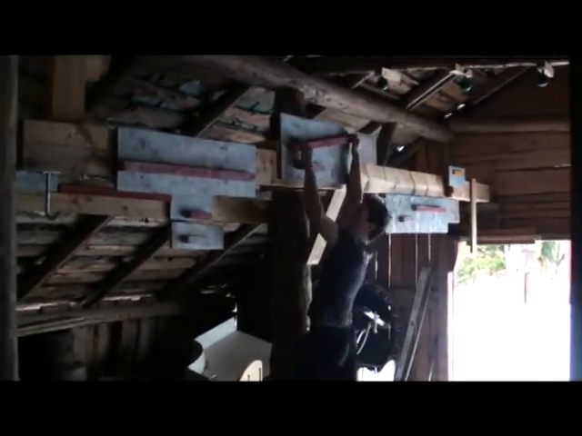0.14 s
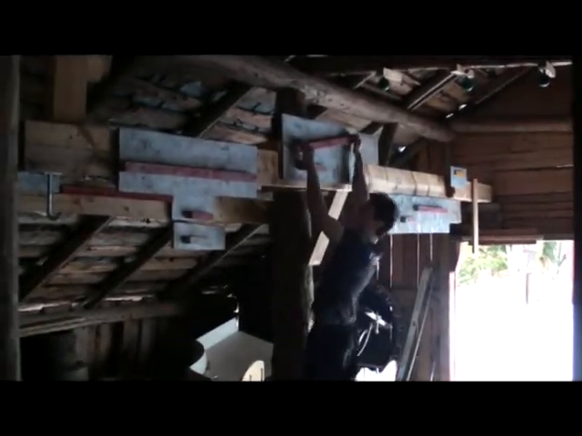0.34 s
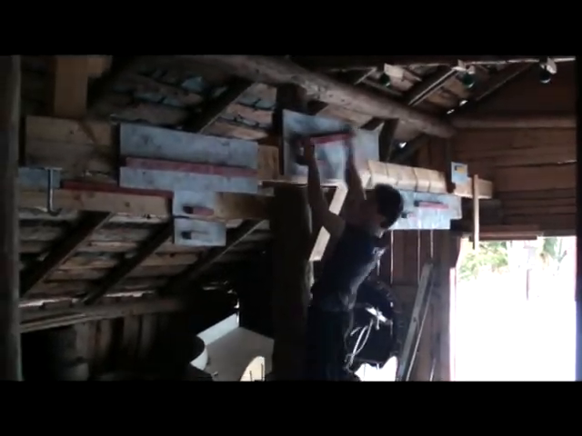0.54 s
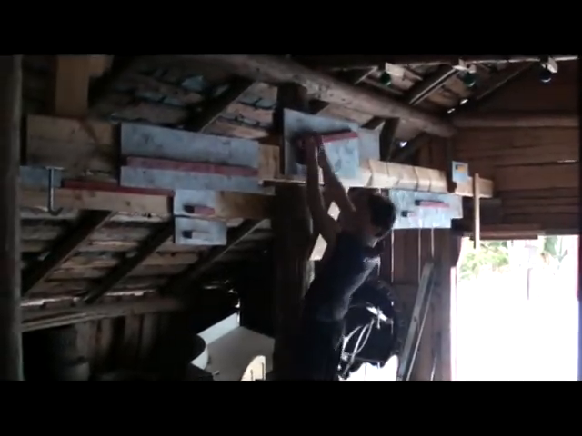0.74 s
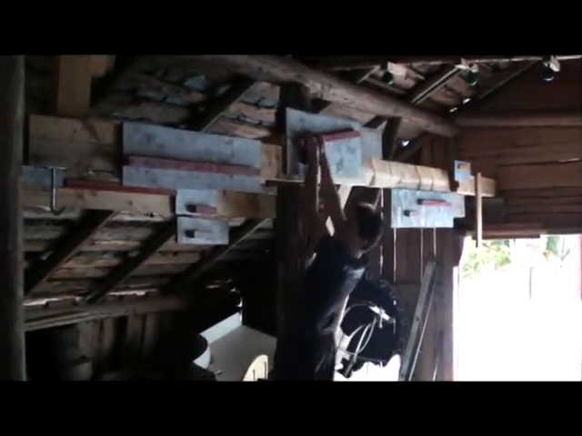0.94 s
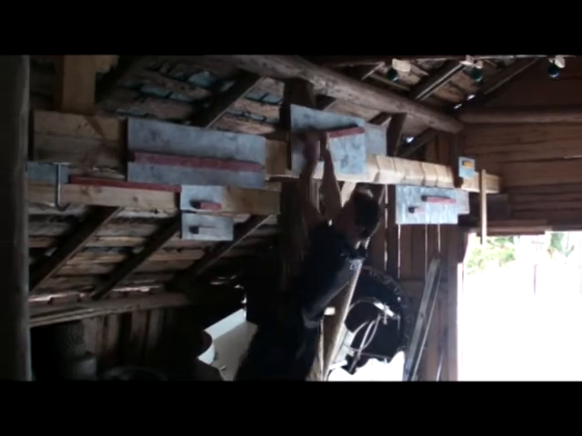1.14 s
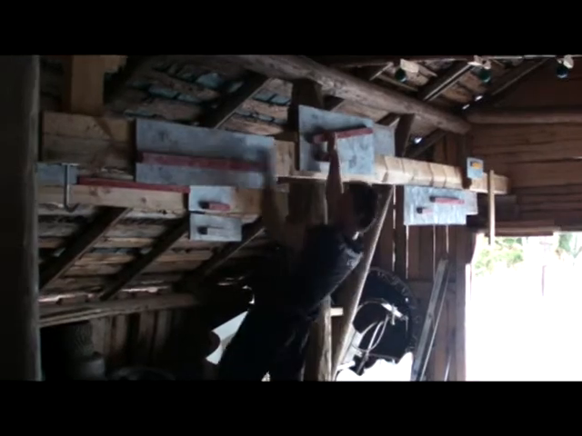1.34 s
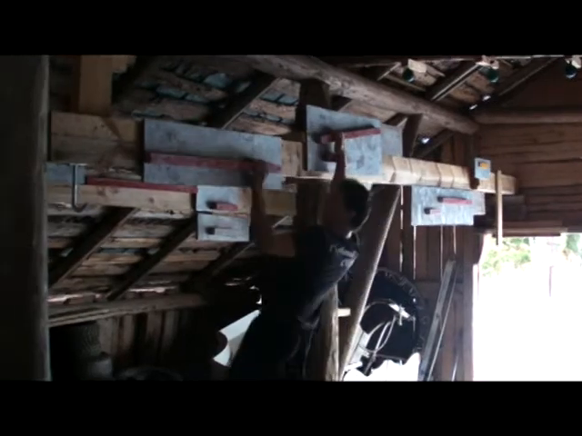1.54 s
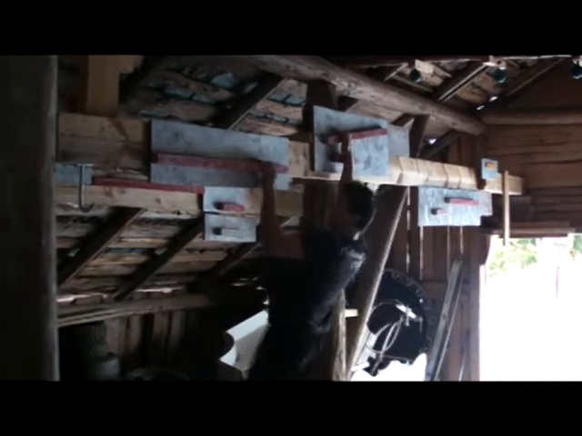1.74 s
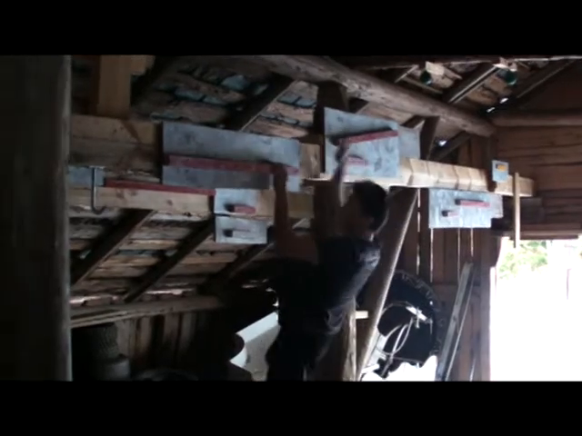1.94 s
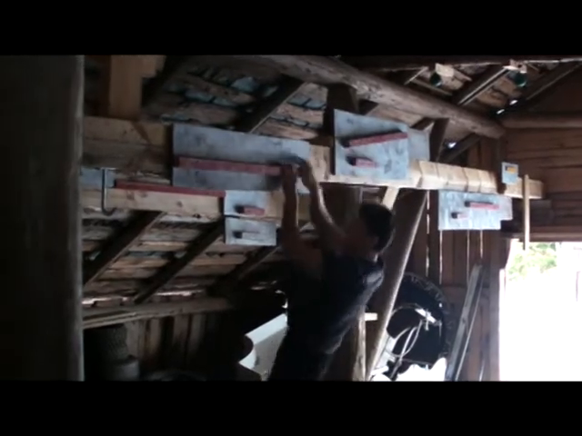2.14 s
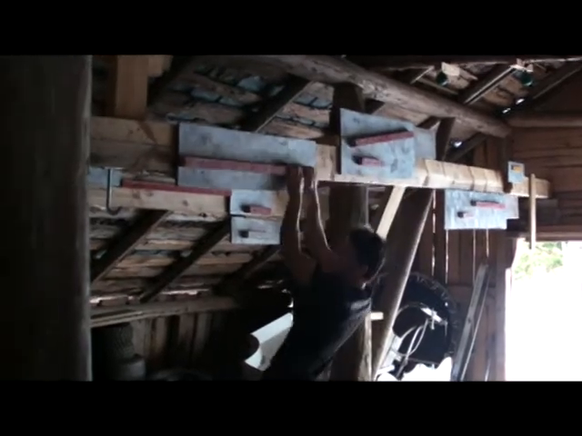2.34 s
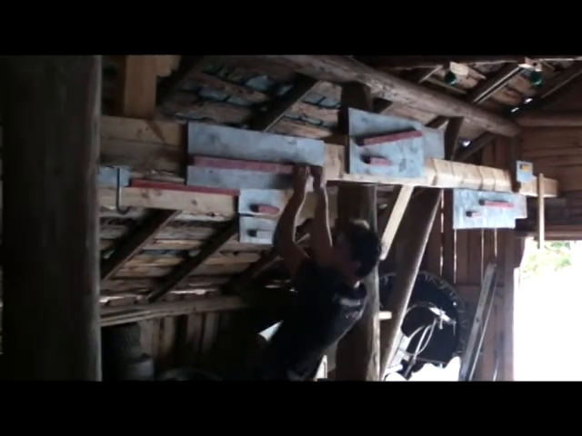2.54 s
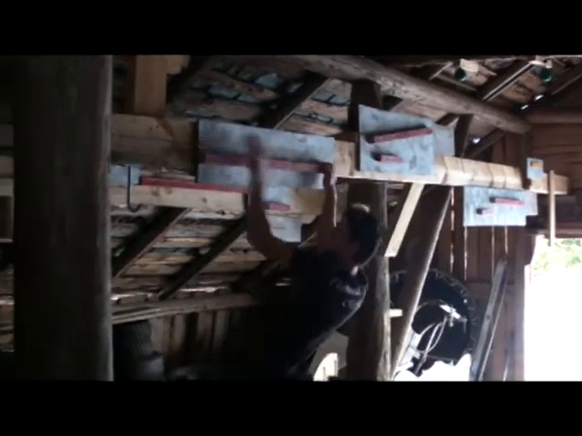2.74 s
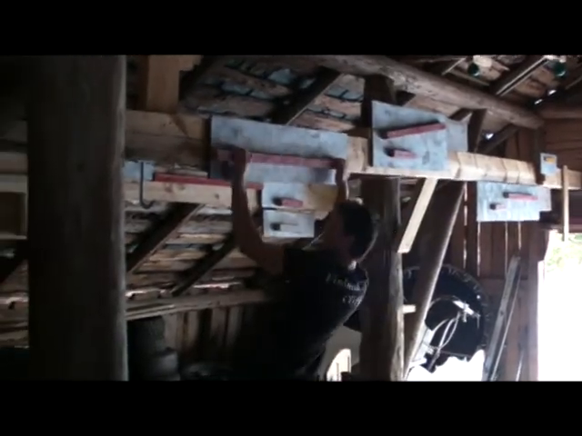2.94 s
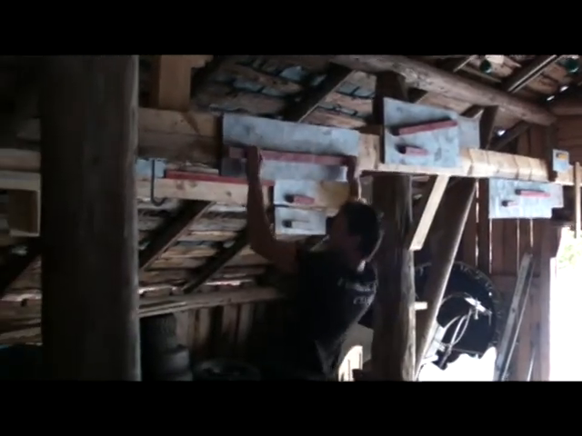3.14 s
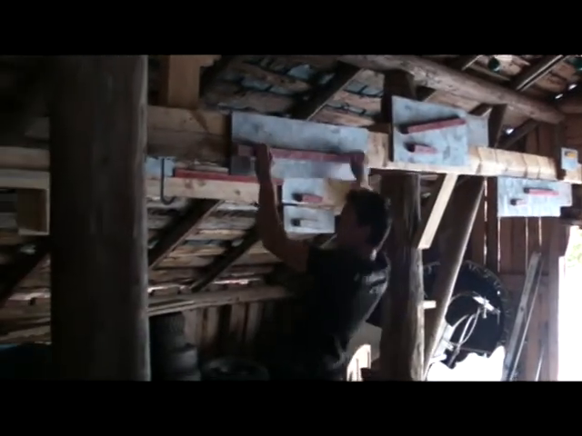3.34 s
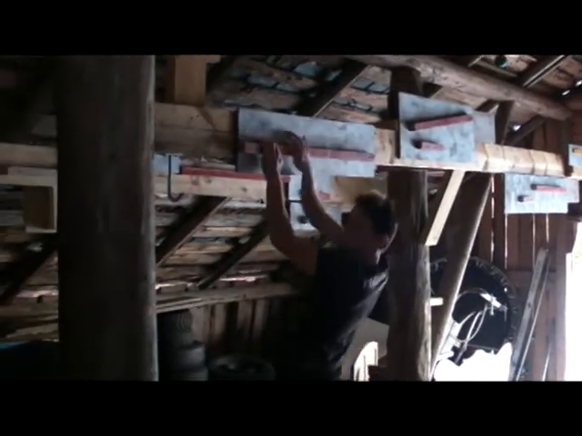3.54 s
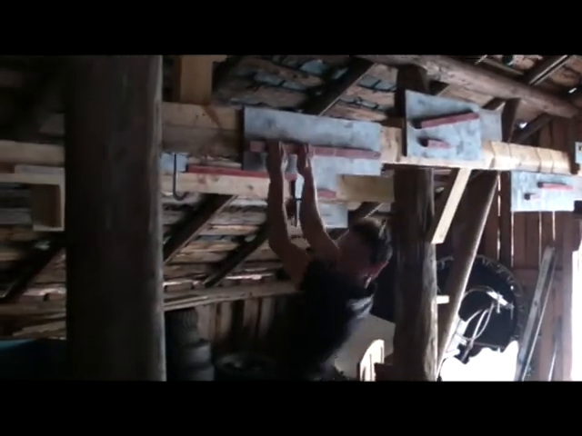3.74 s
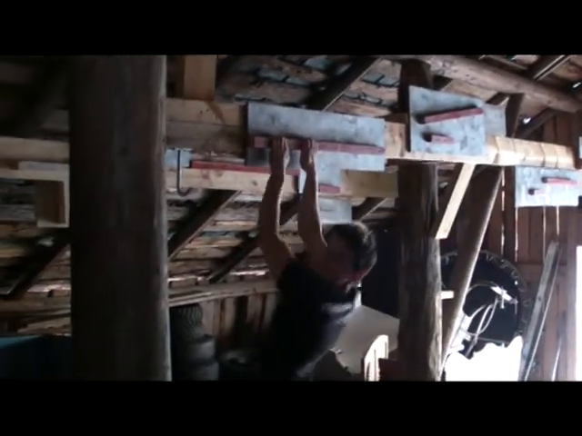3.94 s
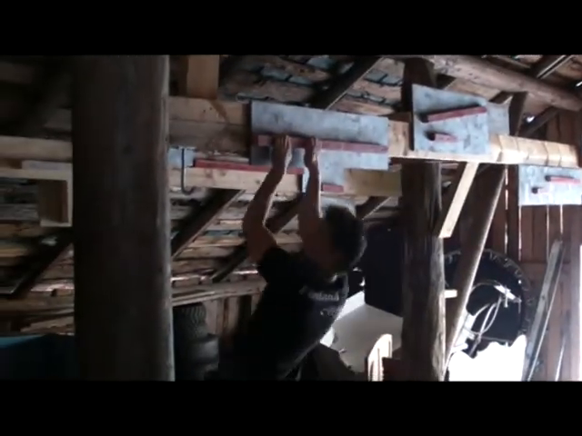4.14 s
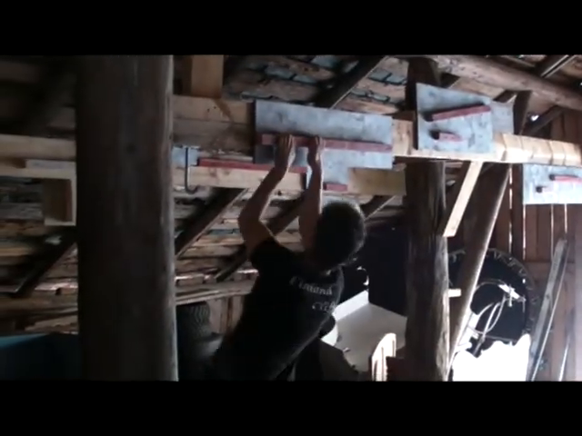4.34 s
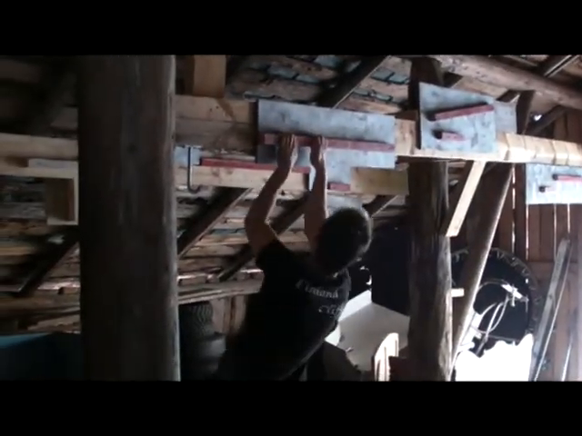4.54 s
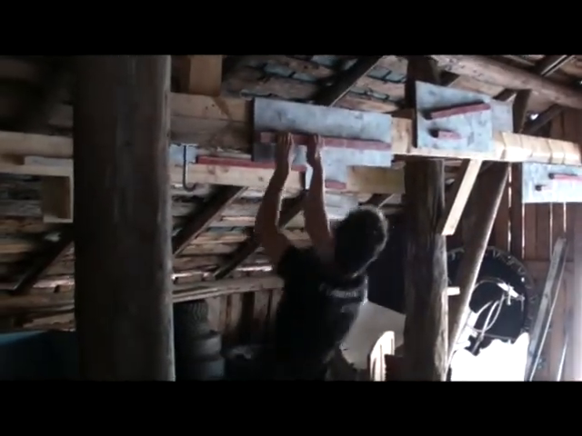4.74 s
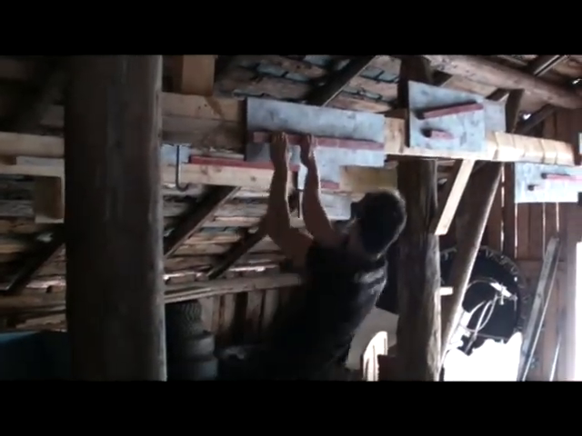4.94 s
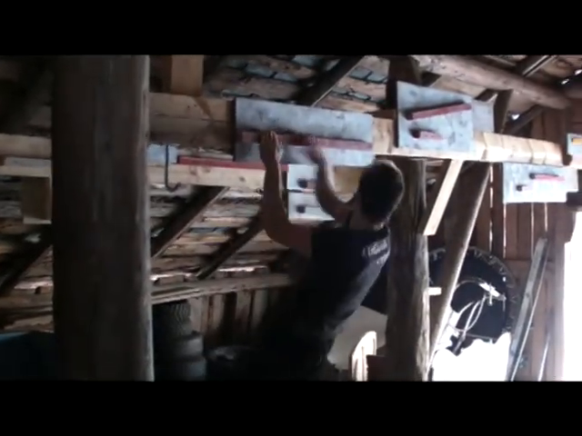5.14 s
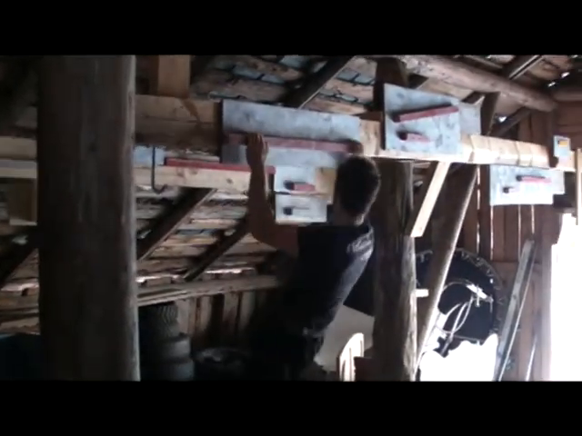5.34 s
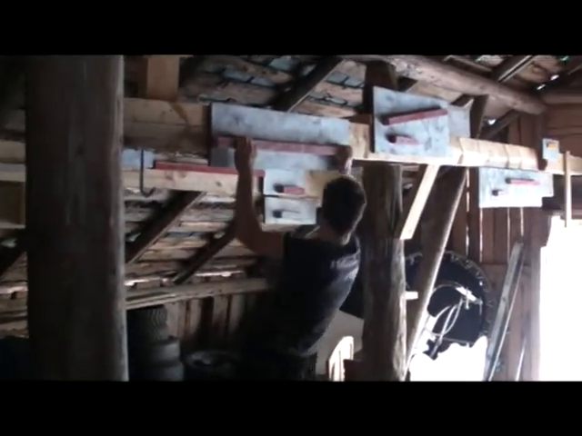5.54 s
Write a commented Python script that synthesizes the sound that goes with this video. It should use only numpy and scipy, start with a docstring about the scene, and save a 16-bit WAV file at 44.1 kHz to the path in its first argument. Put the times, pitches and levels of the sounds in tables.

```python
"""In a barn, a climber traverses narrow wooden ledges screwed to a beam. In each move a hand drags off its hold,
lands with a dull thud and scuffs into its grip; once the loaded timber cracks, once a board knocks hard.
Contacts are impulses through wood resonances plus noise slaps; scuffs are grainy friction noise.
Clothes rustle and the frame rumbles as shaped noise over soft air, with a burst of the rustling noise under
the crack; the barn answers the contacts with brief, dense reflections."""
import sys
import numpy as np
from scipy import signal
from scipy.fft import rfft, irfft, next_fast_len
from scipy.io import wavfile
from scipy.ndimage import map_coordinates

SR = 44100
rng = np.random.default_rng(int(sys.argv[2]) if len(sys.argv) > 2 else 0)


def file_out(sig):
    """Save sig as 16-bit WAV at sys.argv[1]."""
    # one column per channel
    cols = np.atleast_2d(sig).T
    # limit, then scale
    lim = np.clip(cols, -1, 1)
    pcm = np.round(lim * 32767).astype(np.int16)
    wavfile.write(sys.argv[1], SR, pcm)


N = 246959
T = np.arange(SR // 4) / SR  # the life of one blow, s
SCUFF_LEAD_S = .2  # a scuff is begun this long before its peak

# dry friction and slap spectrum: [f/Hz, relative level/dB]
RASP_SPECTRUM = [(100, -37), (400, -14.5), (1000, -8), (1700, -6), (2700, -3.5), (3500, -9.5), (4500, -11),
                 (7000, -14.5), (10000, -13.5), (12000, -38), (16000, -45)]
# bright friction and grit spectrum: [f/Hz, relative level/dB]
HISS_SPECTRUM = [(1000, -5.5), (4000, -18), (6500, -14.5), (8300, -5), (9400, -4), (10600, -12),
                 (12000, -20), (16000, -30)]


def amp(db):
    """Decibels to gain."""
    return 10 ** (np.asarray(db) / 20)


def unit(x):
    """Scaled to rms 1."""
    return x / np.sqrt(np.mean(x ** 2) + 1e-20)


def burst(x):
    """Scaled to the energy of 30 ms at rms 1."""
    return unit(x) * np.sqrt(.03 * SR / x.shape[-1])


def along(points, hz):
    """(Hz, value) points read on a log frequency axis."""
    f, v = np.transpose(points)
    return np.interp(np.log(hz + 1), np.log(f + 1), v)


def curve(rows):
    """(s, value) rows as one value per sample."""
    return np.interp(np.arange(N) / SR, *np.transpose(rows))


def filtered(x, response):
    """x times a complex response of frequency."""
    n = x.shape[-1]
    m = next_fast_len(n + SR // 8, True)  # padded so that tails do not wrap round
    return irfft(rfft(x, m) * response(np.fft.rfftfreq(m, 1 / SR)), m)[..., :n]


def coloured(x, spectrum):
    """x shaped by (Hz, dB) points."""
    return filtered(x, lambda hz: amp(along(spectrum, hz)))


def ring(x, modes):
    """x through parallel band-pass resonances of alternating sign."""
    def response(f):
        total = 0
        for k, (centre, width, db) in enumerate(modes):
            damping = 1j * f * width
            total = total + (-1) ** k * amp(db) * damping / (centre * centre - f * f + damping)
        return total
    return filtered(x, response)


def noise(size):
    """White noise at two close microphones: alike in the bass, less so in the treble."""
    # left-right likeness: [f/Hz, correlation]
    likeness = [(100, .92), (280, .83), (600, .84), (1200, .68), (2500, .68), (4500, .4), (8500, .42),
                (13000, .12)]

    def mid_side_gains(hz):
        turn = np.arccos(np.clip(along(likeness, hz), -1, 1)) / 2
        return np.array([np.cos(turn), np.sin(turn)])
    mid, side = filtered(rng.standard_normal((2, size)), mid_side_gains)
    return np.array([mid + side, mid - side])


def grainy(size, rate, depth_db):
    """Noise that comes in clumps, rate a second, as fibres catch and let go."""
    knots = rng.standard_normal(int(size * rate / SR) + 4)
    clumps = map_coordinates(knots, [np.arange(size) * rate / SR])
    return unit(noise(size) * amp(depth_db * clumps))


def add(track, s, x):
    """Mix x into the track from time s."""
    start = max(round(s * SR), 0)
    track[:, start:start + x.shape[-1]] += x[:, :max(N - start, 0)]


def releases():
    """A hand drags off its hold: the quicker, the sooner it stops and the harder the ledge rings and springs."""
    # drags: [t of the peak/s, rise/s, rasp level/dB, hiss level/dB, centre of the ledge's modes f/Hz,
    # spread/octaves]
    drags = [(.485, 0.068, -46, -54, 543, .8), (1.148, 0.039, -45.5, -44, 950, 0.38),
             (1.886, .024, -38.5, -43, 720, 0.48), (2.615, 0.045, -45.5, -46.5, 1120, 0.39),
             (3.362, .016, -39, -42.5, 950, 0.37), (5.163, 0.032, -39.5, -40, 890, 0.64)]
    usual_rise_s, usual_fall_s = 0.029, 0.029
    quick_db = 8  # gain of the ledge's ring when the rise halves
    out = np.zeros((2, N))
    for s, rise, rasp_db, hiss_db, centre_hz, spread in drags:
        slowness = rise / usual_rise_s
        fall = usual_fall_s * slowness ** 0.33
        ledge_db = rasp_db - quick_db * np.log2(slowness)
        add(out, s - SCUFF_LEAD_S, scuff(rise, fall, rasp_db, hiss_db, ledge_db, centre_hz, spread))
        # the unloaded ledge springs back
        spring = blow(ledge_db - 7, centre_hz=282, spread=0.48, slap_db=rasp_db - 11, room_db=2)
        add(out, s - rise / 2, spring)
    return out


def catches():
    """The palm lands, fingertips and beam follow, then fingers scuff into their grip as the beam takes weight."""
    # landings: [t/s, thud level/dB, centre of the modes struck f/Hz, slap level/dB, room level/dB,
    # beam level/dB, wait until the grip/s, grip rasp level/dB, grip hiss level/dB, grip centre f/Hz,
    # weight thump level/dB]
    landings = [(.712, -36.5, 443, -48, 0.5, -41.5, .096, -41, -53, 726, -41.5),
                (1.3968, -30, 261, -47, -3, -46.5, .052, -41, -44, 430, -44),
                (2.152, -37.5, 152, -44.5, 2, -43, .071, -38, -46, 480, -48),
                (2.861, -40.5, 240, -44, 8, -60, 0.073, -42.5, -39, 1260, -47),
                (3.555, -40, 215, -41.5, 8, -43.5, .089, -37, -42.5, 890, -45),
                (5.368, -36.5, 300, -47, 1, -51, .12, -44, -68, 480, -47)]
    fingers_s, fingers_db, fingers_hz = .011, -8, 358  # fingertips: delay, level against the palm, pitch
    beam_s, beam_hz = 0.0159, 138  # beam thump: delay after the landing, pitch
    out = np.zeros((2, N))
    for (s, thud_db, centre_hz, slap_db, room_db, beam_db,
         wait, rasp_db, hiss_db, grip_hz, weight_db) in landings:
        spread = 0.56 * (centre_hz / 250) ** 0.22  # octaves; a higher-pitched landing strikes a wider range
        add(out, s, blow(thud_db, centre_hz, spread, slap_db, room_db))
        fingers = blow(thud_db + fingers_db, fingers_hz, spread=0.41, slap_db=slap_db - 19, room_db=room_db)
        add(out, s + fingers_s, fingers)
        grip = scuff(rise=0.024, fall=0.035, rasp_db=rasp_db, hiss_db=hiss_db,
                     ledge_db=rasp_db - 5.5, centre_hz=grip_hz, spread=0.77)
        add(out, s + wait - SCUFF_LEAD_S, grip)
        for delay, db in (beam_s, beam_db), (wait, weight_db):
            add(out, s + delay, blow(db, beam_hz, spread=0.37, slap_db=db - 22, room_db=3))
    return out


def blow(thud_db, centre_hz, spread, slap_db, room_db):
    """One contact: a brief noise slap, and a push that rings the ledge."""
    thud = barn(ledge(signal.unit_impulse(len(T)), centre_hz, spread), room_db, hold=0.0068)
    contact = coloured(noise(len(T)) * np.exp(-T / 0.0029), RASP_SPECTRUM)
    slap = barn(contact, room_db - 2.5, hold=0.0032)
    return amp(thud_db) * burst(thud) + amp(slap_db) * burst(slap)


def scuff(rise, fall, rasp_db, hiss_db, ledge_db, centre_hz, spread):
    """Fingers slide: grainy friction swells and stops, rasping, hissing and shaking the ledge."""
    t = np.arange(-SCUFF_LEAD_S, SCUFF_LEAD_S, 1 / SR)
    stroke = 1 / np.cosh(1.516 * t / np.where(t < 0, rise, fall).clip(.003))
    friction = grainy(len(t), rate=1100, depth_db=3.2)
    rasp = stroke * coloured(friction, RASP_SPECTRUM)
    hiss = stroke * coloured(grainy(len(t), rate=900, depth_db=-0.5), HISS_SPECTRUM)
    wood = ledge(stroke * friction, centre_hz, spread)
    size = np.sqrt(np.mean(stroke ** 2))  # a longer stroke carries more energy
    return size * (amp(rasp_db) * unit(rasp) + amp(hiss_db) * unit(hiss) + amp(ledge_db) * unit(wood))


def ledge(x, centre_hz, spread):
    """The place and softness of a contact pick which of the ledge's modes answer."""
    # resonances of ledge and backing board: [f/Hz, width/Hz, relative level/dB]
    wood_modes = [(114.3, 24, 3.5), (157.6, 30, 2.5), (240, 29.6, 1.5), (295, 14, 2), (326.3, 19.7, 1.5),
                  (403.5, 38, -2), (607.6, 48, 1), (745, 45, -1), (803, 77, -6.5), (979, 85, -2),
                  (1135, 59, -4), (1328, 57, 2), (1633, 22, 0), (2060, 140, 0), (2410, 81, -10),
                  (2820, 130, -7), (3860, 120, -2)]
    away_db = lambda hz: min(3 * (np.log2(hz / centre_hz) / spread) ** 2, 80)
    return ring(x, [(hz, width, db - away_db(hz)) for hz, width, db in wood_modes])


def barn(x, wet_db, hold):
    """Direct sound plus dense reflections that stay level for hold seconds, then die away."""
    # reverberation: [f/Hz, time to fall 60 dB/s]
    decay_times = [(100, 0.39), (400, 0.2), (1200, 0.22), (3000, 0.2), (6000, 0.19), (9000, 0.24),
                   (15000, 0.18)]
    hz, t, bins = signal.stft(noise(len(T)), SR, nperseg=256)
    fade = amp(-60 * np.maximum(t - hold, 0) / along(decay_times, hz)[:, None])
    tail = signal.istft(bins * fade, SR, nperseg=256)[1][:, :len(T)]
    tail = tail * np.clip(T / 0.0045, 0, 1)  # reflections build up over 4.5 ms
    echo = signal.fftconvolve(np.atleast_2d(x), tail, axes=1)[:, :x.shape[-1]]
    return unit(x) + amp(wet_db) * unit(echo)


def crack():
    """The loaded timber lets go in one snap; splintering clatter fills the barn, the ledge rings behind it."""
    # resonances of the cracking timber: [f/Hz, width/Hz, relative level/dB]
    timber_modes = [(810, 310, -2), (1260, 450, -1), (2050, 520, -1), (2660, 370, 4.5), (3720, 420, -3.5),
                    (5150, 300, -4.5), (7100, 280, -4.5), (8540, 670, -4.5)]
    # the snap loses its highest treble on the way: [f/Hz, relative level/dB]
    treble_loss = [(9500, 4), (12000, -3), (16000, -10)]
    # clatter spectrum: [f/Hz, relative level/dB]
    splinter_spectrum = [(80, -16), (200, -11.5), (380, -13.5), (560, -4.5), (900, -6), (1300, -1),
                         (2000, -10), (2700, -5), (3600, -9.5), (4500, -11), (8800, -13.5), (11000, -23.5),
                         (15500, -41)]
    crack_s = 2.406
    out, push = np.zeros((2, N)), signal.unit_impulse(len(T))
    tearing = 0.17 * noise(len(T)) * np.exp(-T / 0.0032)
    snap = coloured(ring(push + tearing, timber_modes), treble_loss)
    clatter = coloured(barn(push, wet_db=24, hold=0.033), splinter_spectrum)
    add(out, crack_s, amp(-17.0) * burst(snap) + amp(-18) * burst(clatter))
    answer = blow(thud_db=-28.5, centre_hz=563, spread=0.22, slap_db=-52, room_db=5.0)
    add(out, crack_s + .012, answer)
    return out


def board():
    """A board slips and knocks hard: its edge clicks, its face strikes twice, and the beam thuds behind it."""
    knock_s, knock_db = 3.7762, -28.5
    chatter_s = .0037  # gap between its contacts
    out = np.zeros((2, N))
    slip = scuff(rise=0.0073, fall=.004, rasp_db=-56, hiss_db=-48, ledge_db=-30.5, centre_hz=600, spread=1.2)
    add(out, knock_s - SCUFF_LEAD_S, slip)
    add(out, knock_s, blow(knock_db - 7.0, centre_hz=2400, spread=0.42, slap_db=-35.5, room_db=4))
    for contact in (1, 2):
        face = blow(knock_db, centre_hz=814, spread=.36, slap_db=-39.5, room_db=-8.0)
        add(out, knock_s + contact * chatter_s, face)
    add(out, knock_s + .0128, blow(knock_db - 4.5, centre_hz=247, spread=.8, slap_db=-50, room_db=-1))
    return out


def knocks():
    """The frame gives a little under the moving load and knocks softly."""
    # soft knocks: [t/s, thud level/dB, centre of the modes f/Hz, spread/octaves]
    soft_knocks = [(.002, -44.5, 112, .14), (0.7936, -45, 895, 1.3), (2.277, -43, 300, 1.3),
                   (2.337, -45, 450, 0.63), (2.358, -42.5, 600, 2.6), (3.041, -37.5, 362, 0.4),
                   (3.341, -34.5, 740, .17), (5.41, -45, 290, 0.24), (5.494, -45.5, 754, .3)]
    out = np.zeros((2, N))
    for s, db, centre_hz, spread in soft_knocks:
        add(out, s, blow(db, centre_hz, spread, slap_db=db - 11, room_db=1.5))
    return out


def shifts():
    """Between moves the fingers creep on their hold in small scuffs."""
    # creeps: [t of the peak/s, rise and fall/s, rasp level/dB]
    creeps = [(.06, .02, -55.5), (.27, 0.09, -50), (1.075, 0.03, -49), (1.525, 0.058, -46),
              (1.604, 0.018, -42), (2.37, 0.017, -43), (3.033, 0.013, -40)]
    out = np.zeros((2, N))
    for s, length, db in creeps:
        creep = scuff(length, length, db, hiss_db=db - 5.5, ledge_db=db - 6, centre_hz=425, spread=0.58)
        add(out, s - SCUFF_LEAD_S, creep)
    return out


def grit():
    """Specks of dirt under the fingers snap with tiny bright ticks: short, decaying noise."""
    # ticks: [t/s, level/dB]
    specks = [(.5, -43.5), (1.939, -47.5), (2.521, -44.5), (4.819, -53.5), (4.868, -53.5)]
    out = np.zeros((2, N))
    for s, db in specks:
        tick = coloured(noise(len(T)) * np.exp(-T / 0.0026), HISS_SPECTRUM[1:])
        add(out, s, amp(db) * burst(barn(tick, wet_db=-2, hold=.004)))
    return out


def swinging():
    """Clumpy noise rustles as clothes do and bursts under the crack; low noise rumbles as the frame sways."""
    # spectrum of the rustling noise: [f/Hz, relative level/dB]
    cloth_spectrum = [(150, -22), (400, 2), (1200, -2), (2700, -4.5), (4500, -3), (6500, -4), (9000, -0.5),
                      (10500, -6.5), (12000, -13.5), (16000, -19)]
    # course of the rustle, with a burst of noise under the timber's crack:
    # [t/s, level before the overall trim/dB]
    rustle_and_burst = [(0.0, -53.5), (0.39, -53.5), (1.45, -56.5), (1.62, -52.5), (2.26, -56.5),
                        (2.42, -48), (2.63, -58), (2.9, -56), (3.06, -50.5), (3.7, -53.5), (4.21, -61),
                        (4.73, -59), (4.99, -54), (5.6, -54.5)]
    # course of the frame rumble: [t/s, level before the overall trim/dB]
    sway_course = [(0.0, -44.5), (0.56, -63), (0.78, -43.5), (1.14, -61.5), (1.51, -49.5), (1.82, -60),
                   (1.92, -48), (2.12, -59), (2.17, -46), (2.87, -61), (2.92, -50), (3.35, -61),
                   (3.82, -44.5), (4.05, -60.5), (5.1, -64), (5.16, -48), (5.46, -52.5), (5.6, -43)]
    rumble_spectrum = [(12, -16.0), (28, 5.5), (60, -1.5), (115, -1.5), (170, -9.5), (400, -41)]  # (Hz, dB)
    rustling = unit(coloured(grainy(N, rate=120, depth_db=1.1), cloth_spectrum))
    rumble = unit(coloured(noise(N), rumble_spectrum))
    return amp(curve(rustle_and_burst) + 4.5) * rustling + amp(curve(sway_course) - 1) * rumble


def air():
    """Outdoor air through the open door: a steady low rush, and above it a steady hiss."""
    # air spectrum: [f/Hz, relative level/dB]
    air_spectrum = [(12, -41), (20, -1), (44, -22), (80, -4.5), (148, -11.5), (185, -7.5), (289, -5.5),
                    (404, -3), (631, -16.5), (705, -12.5), (811, -12), (1200, -13), (1450, -23.5),
                    (5380, -28), (15500, -25)]
    low_power = lambda hz: 1 / (1 + (hz / 1200) ** 4)  # rush and hiss cross over at 1200 Hz
    rush = filtered(unit(noise(N)), lambda hz: np.sqrt(low_power(hz)))
    hiss = filtered(unit(noise(N)), lambda hz: np.sqrt(1 - low_power(hz)))
    return amp(-54.0) * unit(coloured(rush + hiss, air_spectrum))


def scene():
    """The climber's sounds lead in phase on the left, with a left-right balance that varies with pitch."""
    # balance: [f/Hz, left minus right level/dB]
    balance = [(500, .3), (1100, .8), (2200, 3.3), (4300, 4), (6500, 1), (8500, -.7), (12000, 1.3)]
    # lead of the left microphone: [f/Hz, phase/rad]
    phase_lead = [(100, 0), (1000, .25), (2760, .6), (3600, 1.3), (4400, 2.8), (6500, 4.6), (9100, 5.7),
                  (13000, 7)]
    hands = releases() + catches() + shifts() + grit()
    wood = knocks() + board() + crack()
    climber = hands + wood + swinging()
    sides = np.array([[.5], [-.5]])  # each side takes half of the difference

    def placing(hz):
        return amp(sides * along(balance, hz)) * np.exp(1j * sides * along(phase_lead, hz))
    return air() + filtered(climber, placing)


def record(dry):
    """Clips at full scale, then keeps nothing from 15.8 kHz up."""
    return filtered(np.clip(dry, -1, 1), lambda hz: hz < 15800)


dry = scene()
out = record(dry)
file_out(out)
```